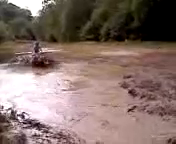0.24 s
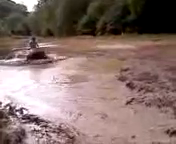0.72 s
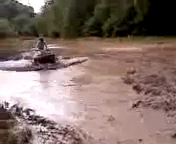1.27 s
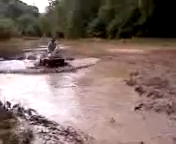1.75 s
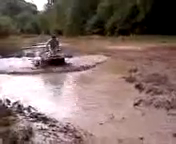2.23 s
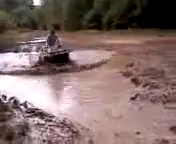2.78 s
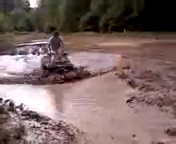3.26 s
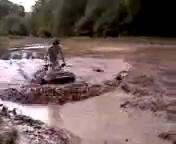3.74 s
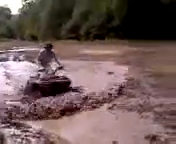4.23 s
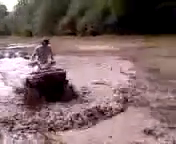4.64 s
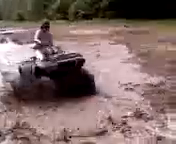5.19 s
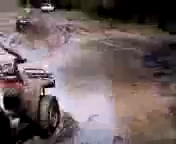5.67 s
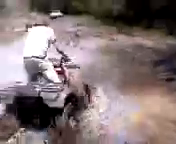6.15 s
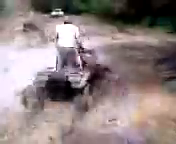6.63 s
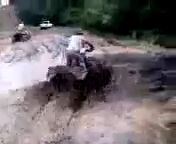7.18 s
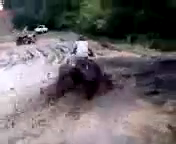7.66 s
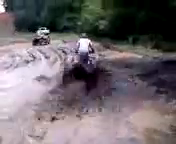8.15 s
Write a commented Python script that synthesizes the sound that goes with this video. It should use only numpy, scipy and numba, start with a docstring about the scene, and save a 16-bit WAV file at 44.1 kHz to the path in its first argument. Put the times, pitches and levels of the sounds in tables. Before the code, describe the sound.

A single-cylinder quad bike mutters at a distance on a muddy pond, then revs and wades closer, its wheels pushing a gurgling bow wave under hissing spray. Abruptly it is right beside the microphone, rasping and blaring amid mud slaps, short squeals and overload ticks, then churns away with a few sharp exhaust barks. Narrow, slightly distorted small-microphone sound, outdoors.

```python
"""A single-cylinder quad bike mutters across a muddy pond, then pulls away and wades toward the listener.
Its firings ring the silencer, the wheels push a gurgling bow wave and drops patter over hissing spray.
The viewpoint jumps beside the bike: the note is muddier, gas rasps and bodywork colours the hiss, amid
mud slaps, short squeal-like rings near 2.1 kHz and brief overload ticks.
The bike then turns its tail, so gas takes over the hiss, and a few barks crack out as it churns away."""
import sys
import numpy as np
from scipy import signal
from scipy.fft import rfft, irfft, next_fast_len
from scipy.io import wavfile
from scipy.ndimage import uniform_filter1d
from numba import njit

SR = 44100
rng = np.random.default_rng(int(sys.argv[2]) if len(sys.argv) > 2 else 0)


def to_wav(s):
    """Save 16-bit WAV."""
    ch = np.atleast_2d(s).T  # columns
    pcm = np.round(np.clip(ch, -1, 1) * 32767)  # PCM
    wavfile.write(sys.argv[1], SR, pcm.astype(np.int16))


N = 370881
TIME = np.arange(N) / SR


def undb(db):
    """Decibels to gain."""
    return 10 ** (np.asarray(db) / 20)


def unit(x):
    """Scale to rms 1."""
    return x / np.sqrt(np.mean(x ** 2))


def curves(table):
    """Each column of a table, after its time column, as a value per sample."""
    time_s, *columns = np.transpose(table)
    return [np.interp(TIME, time_s, column) for column in columns]


def noise():
    """White noise."""
    return rng.standard_normal(N)


def walk(rate_hz):
    """Slow random drift at rms 1: random steps at this rate, smoothed twice."""
    step = int(SR / rate_hz)
    held = np.repeat(noise()[:N // step + 1], step)
    smooth = uniform_filter1d(uniform_filter1d(held, step), step)
    return unit(smooth[:N])


def colour(x, points):
    """Shape a sound with a (freq_hz, level_db) curve, straight in log frequency, then set rms 1."""
    size = next_fast_len(N + 4096)
    freq_hz, level_db = np.transpose(sorted(points))
    bins_hz = np.maximum(np.arange(size // 2 + 1) * SR / size, 1)
    gain = undb(np.interp(np.log(bins_hz), np.log(freq_hz), level_db))
    return unit(irfft(rfft(x, size) * gain, size)[:N])


def blend(a, b, share):
    """Mix two unrelated sounds at constant power; share is that of b."""
    share = np.clip(share, 0, 1)
    return np.sqrt(1 - share) * a + np.sqrt(share) * b


@njit
def svf(x, hz, width_hz):
    """State-variable band-pass with a moving centre."""
    out, band, low = np.empty(len(x)), 0., 0.
    for i in range(len(x)):
        g, damping = np.tan(np.pi * hz[i] / SR), width_hz / hz[i]
        v = (band + g * (x[i] - low)) / (1 + g * (g + damping))
        band, low, out[i] = 2 * v - band, low + 2 * g * v, damping * v
    return out


def resonate(x, hz, width_hz):
    """One resonance, fixed or moving, gain 1 at its centre."""
    return svf(x + 1e-18, hz * np.ones(N), float(width_hz))


def low_pass(x, hz):
    """A steep low-pass."""
    return signal.sosfilt(signal.ellip(10, .2, 80, hz, fs=SR, output="sos"), x)


def bubbles(low_hz, high_hz, cycles, glide, spread_db, count):
    """Many short rings that rise in pitch as they die; a few are much louder than the rest."""
    out = np.zeros(N + SR)
    for when, pitch, size, life in rng.random((count, 4)):
        hz = low_hz * (high_hz / low_hz) ** pitch
        length = min(int(cycles * (.5 + life) * SR / hz), SR)
        age, start = np.arange(length) / length, int(when * N)  # age runs 0-1
        tone = np.sin(2 * np.pi * hz * length / SR * age * (1 + glide * age / 2))
        level_db = -spread_db * np.log(max(size, np.exp(-5)))
        out[start:start + length] += undb(level_db) * np.sqrt(hz) * tone * np.exp(-np.log(100) * age)
    return unit(out[:N])


def ring(start_s, hz, decay_s):
    """A quickly swelling, dying oscillation, at peak 1."""
    out, start = np.zeros(N + SR), int(start_s * SR)
    age_s = np.arange(SR // 10) / SR
    swell = 1 - np.exp(-age_s / 0.00023)
    out[start:start + len(age_s)] = np.sin(2 * np.pi * hz * age_s) * np.exp(-age_s / decay_s) * swell
    return out[:N] / np.abs(out).max()


def swells(rows, attack_s, release_s):
    """Gain in dB over time: each (start_s, length_s, gain_db) row rises, holds and falls back."""
    total_db = np.zeros(N)
    for start_s, length_s, gain_db in rows:
        rise = (TIME - start_s) / attack_s
        fall = 1 - (TIME - start_s - length_s) / release_s
        total_db += gain_db * np.clip(np.minimum(rise, fall), 0, 1)
    return total_db


def close_up():
    """0 while the bike is heard across the pond, 1 once the viewpoint has jumped beside it."""
    view_change_s, fade_s = 5.46, 0.0085
    return np.clip(.5 + (TIME - view_change_s) / fade_s, 0, 1)


def by_view(far, near):
    """Pass from the distant to the close sound when the viewpoint changes."""
    return blend(far, near, close_up())


def astern(front, rear):
    """A value that slides from its front to its rear setting as the tail swings toward the listener."""
    turn_middle_s, turn_length_s = 6.52, 1.3
    return front + (rear - front) * np.clip(.5 + (TIME - turn_middle_s) / turn_length_s, 0, 1)


# how deep the exhaust outlet sits in the water: time_s, depth (0-1)
OUTLET_DEPTH = [(0, .3), (.85, 0), (1.45, .65), (1.75, .45), (2.35, .8), (3.1, 0), (3.4, 1), (4.6, .9),
                (6.05, .5), (6.8, 0), (7.7, 0.5), (8.15, .05), (8.41, 0)]


def outlet_depth():
    """Depth of the exhaust outlet, 0 in air to 1 at its deepest."""
    return curves(OUTLET_DEPTH)[0]


# engine speed: time_s, firing_rate_hz
ENGINE_SPEED = [(0, 35.3), (.5, 29.7), (.95, 40), (1.12, 38.6), (1.38, 47), (1.6, 34.8), (1.92, 42.6),
                (2.08, 41), (2.26, 49.6), (2.48, 45.4), (2.6, 38.3), (2.88, 34.7), (3.44, 44), (3.61, 41.8),
                (3.82, 45.8), (4.03, 43), (4.26, 44.4), (4.38, 48.8), (4.78, 43), (5.08, 33), (5.38, 30.5),
                (5.65, 49), (5.88, 53.6), (6.18, 51), (6.65, 41.8), (7, 52.5), (7.17, 49.3), (7.62, 49.7),
                (7.94, 45.4), (8.15, 49.8), (8.41, 51.8)]


def firing_rate():
    """Firings per second."""
    return curves(ENGINE_SPEED)[0]


def revs():
    """Engine speed in octaves above a 45 Hz cruise."""
    return np.log2(firing_rate() / 45)


# how far away the bike is: time_s, distance_m
BIKE_DISTANCE = [(0, 41), (.75, 29.6), (1.3, 23.4), (2.1, 19.5), (2.9, 14), (3.6, 12), (4.5, 8.46),
                 (5.45, 6.34), (5.47, 3.5), (6, 2.35), (6.6, 3.75), (7.4, 3.65), (8.41, 5.55)]


def distance():
    """Metres from the listener to the bike."""
    return curves(BIKE_DISTANCE)[0]


def loudness(at_1m_db, per_doubling_db, per_octave_db, rear_db):
    """Level in dB: cruising at 1 m, lost per doubling of distance, gained per octave of revs and from behind."""
    return at_1m_db - per_doubling_db * np.log2(distance()) + per_octave_db * revs() + astern(0, rear_db)


# the exhaust blows clear of water and mud and blares: start_s, length_s, gain_db
EXHAUST_BLARES = [(1.6, .45, 3), (2.22, 0.26, 5), (3.72, 0.25, 3), (4.24, 0.48, 3.5), (5.2, 0.25, 3.5),
                  (5.39, 0.12, 11), (5.83, 0.22, 5.5), (6.04, 0.11, 11.5), (6.27, 0.25, 13.5),
                  (6.54, 0.16, 6.5), (6.68, 0.069, 7.5), (6.81, .16, 9), (7.18, .22, 6), (7.59, 0.15, 10),
                  (7.82, .15, 9.5), (7.97, .14, 13), (8.11, .35, 10)]


def blare_db():
    """Extra level of the exhaust while it blows clear."""
    return swells(EXHAUST_BLARES, attack_s=0.025, release_s=0.015)


# low rumble of the moving machine and air: freq_hz, level_db
RUMBLE_SPECTRUM = [(15, -5), (30, 0.5), (60, -1), (110, 1.5), (170, 0.5), (300, -2.5), (700, -46)]


def rumble():
    """The machine shakes air and water as low noise, strongest when it wades deep or blares."""
    level_db = loudness(at_1m_db=-44, per_doubling_db=2.5, per_octave_db=5, rear_db=4)
    effort_db = 5 * outlet_depth() + 0.55 * blare_db()
    return undb(level_db + effort_db + 1.1 * walk(9.7)) * colour(noise(), RUMBLE_SPECTRUM)


# the wheels plunge and throw up water: start_s, length_s, spray_gain_db, wave_gain_db
WHEEL_SPLASHES = [(-.02, 0.08, 9, 5.5), (0.091, 0.45, 5.5, 0), (0.519, 0.036, -0.5, 7.5),
                  (1.08, 0.26, 0, 5.5), (1.342, .04, 1, 6.5), (2.252, 0.039, 0.5, 6.5),
                  (3.308, 0.058, 3, 2), (3.4, 0.069, 0, 2.5), (4.373, 0.073, 1.5, 3.5),
                  (4.61, 0.14, 1, 2.5), (5.02, 0.07, 0, 4), (5.27, .18, -2, 5), (5.466, 0.072, 3, 3.5),
                  (5.824, .3, 0, 0), (6.15, 0.13, -2, 4.5), (6.32, .17, 2, 2.5), (6.677, 0.069, 3.5, 3),
                  (6.87, 0.04, 0.5, 8), (6.98, .05, 2, -2.5), (7.257, .08, 2, -1.5),
                  (7.405, 0.022, 0.5, 9.5), (8.067, 0.17, 1.5, -1.5), (8.335, 0.071, -1, 7)]


def splash_spray_db():
    """Extra spray level as the wheels plunge."""
    rows = [(start_s, length_s, spray_db) for start_s, length_s, spray_db, _ in WHEEL_SPLASHES]
    return swells(rows, attack_s=0.0083, release_s=.05)


def splash_wave_db():
    """Extra bow wave level as the wheels plunge, slower to rise and quicker to fall than the spray."""
    rows = [(start_s, length_s, wave_db) for start_s, length_s, _, wave_db in WHEEL_SPLASHES]
    return swells(rows, attack_s=0.018, release_s=0.026)


# churned muddy water: freq_hz, level_db
SLOSH_SPECTRUM = [(120, -9.5), (250, -0.5), (400, -2.5), (560, 0.6), (800, 2.5), (1000, -8), (1350, -3.5),
                  (1700, -15), (2600, -40.5)]
# froth on the breaking wave: freq_hz, level_db
FROTH_SPECTRUM = [(400, -16), (780, -6), (900, 2), (1080, -0.5), (1400, 1), (1700, -6), (2600, -21.5)]


def bow_wave():
    """Large gurgling bubbles over a surging wash, with froth where the wave breaks."""
    gurgle = bubbles(288, 1600, cycles=5.6, glide=0.085, spread_db=3.5, count=5000)
    wash = noise() * undb(2 * walk(25))
    slosh = blend(colour(gurgle, SLOSH_SPECTRUM), colour(wash, SLOSH_SPECTRUM), 0.44)
    small_bubbles = bubbles(700, 1900, cycles=9.7, glide=0.059, spread_db=3.0, count=5000)
    # froth loses 1 dB every 2 m, and 9 dB from behind
    froth_db = 0.5 - distance() / 2.0 + astern(0, -9)
    wave = slosh + undb(froth_db) * colour(small_bubbles, FROTH_SPECTRUM)
    level_db = loudness(at_1m_db=-24.5, per_doubling_db=3.5, per_octave_db=3, rear_db=1.5)
    return undb(level_db + splash_wave_db() + 1.1 * walk(14)) * wave


def hollows(x):
    """Close sounds take on the ring of the tailpipe and two drifting resonances, wheel arch and frame."""
    drift = 0.051  # share of pitch
    arch_hz = astern(2330, 2120) * (1 + drift * walk(11))
    frame_hz = 3100 * (1 + drift * walk(11))
    # the arch is hidden from behind; the other openings face the rear
    arch = undb(astern(0, -1.5)) * resonate(x, arch_hz, width_hz=440)
    frame = undb(astern(-1.5, 5.5)) * resonate(x, frame_hz, width_hz=180)
    tailpipe = undb(astern(-17, -2.5)) * resonate(x, hz=1760, width_hz=180)
    return unit(x + arch + frame + tailpipe)


# spray and gas heard from across the pond: freq_hz, level_db
FAR_SPECTRUM = [(650, -48), (1100, -12), (1390, -7.5), (1700, -8), (1960, 2), (2200, -3.5), (2460, 3),
                (2870, -4.5), (3190, 2), (3480, -5.5), (4380, -35.5), (5690, -62.5), (9640, -120)]
# spray beside the wheels: freq_hz, level_db
NEAR_SPECTRUM = [(650, -28.5), (1100, -12.5), (1320, -34), (1640, -16.5), (1770, -4), (2230, -0.5),
                 (2390, 1), (2730, -5), (3240, -2), (3380, 0), (3620, -7), (4380, -35), (5690, -74.5),
                 (9640, -120)]


def spray():
    """Drops patter on the pond over the hiss of torn water, in uneven sheets."""
    drops = bubbles(1400, 4148, cycles=33, glide=0.013, spread_db=2.5, count=10000)
    torn_water = noise()
    far = blend(colour(drops, FAR_SPECTRUM), colour(torn_water, FAR_SPECTRUM), 0.83)
    near = blend(colour(drops, NEAR_SPECTRUM), colour(torn_water, NEAR_SPECTRUM), 0.63)
    return by_view(far, hollows(near)) * undb(0.91 * walk(35))


def puff(age_s, rise_s, decay_s, rest):
    """Turbulent gas that bursts out after each firing and dies down to a steady flow."""
    burst = (1 - np.exp(-age_s / rise_s)) * np.exp(-age_s / decay_s)
    return unit(noise() * (rest + burst))


# gas leaving the outlet, heard close up: freq_hz, level_db
GAS_SPECTRUM = [(590, -46.5), (1000, -10), (1240, -15), (1400, -3), (1610, 1.5), (1910, -11.5), (2000, -3),
                (2130, 2.5), (2270, -0.5), (2660, -7), (2880, 3.5), (3080, -4), (3590, -5.5), (4090, -16),
                (4380, -33.5), (5690, -57), (9640, -120)]


def gas(age_s, strength):
    """Each firing spits a rasping burst of gas, as strong as the firing itself."""
    bursts = strength * puff(age_s, rise_s=.003, decay_s=.0058, rest=.17)
    return by_view(colour(bursts, FAR_SPECTRUM), hollows(colour(bursts, GAS_SPECTRUM)))


def ripples(x, lag_s, sway, rate_hz, gain):
    """An echo off the heaving water; its changing delay slides the bright bands about."""
    lag = lag_s * SR * (1 + sway * walk(rate_hz))
    samples = np.arange(N)
    return unit(x + gain * np.interp(samples - lag, samples, x))


def hiss(age_s, strength):
    """Spray and exhaust gas share the treble, with more gas from behind, and waver off the choppy surface."""
    sizzle = blend(spray(), gas(age_s, strength), astern(0.092, 0.65))
    wavering = ripples(sizzle, lag_s=.0019, sway=.16, rate_hz=14, gain=.38)
    level_db = loudness(at_1m_db=-8.5, per_doubling_db=5.5, per_octave_db=.5, rear_db=-.5)
    return undb(level_db + splash_spray_db()) * wavering


# mud slaps, short squeal-like rings near 2.1 kHz (5.511-5.546 s) and brief overload ticks
# (5.91-6.08 s, 6.965-6.983 s): start_s, ring_peak_db, pitch_hz, decay_s, thud_db (relative to the ring)
SHORT_HITS = [(4.171, -17, 2400, .002, -8), (5.436, -11, 1090, .0019, -10), (5.511, -6, 2144, .0056, -29),
              (5.528, -6, 2054, .0064, -23), (5.546, -11, 2320, .007, -35.5),
              (5.855, -10, 2630, 0.0051, -11), (5.91, -4, 2840, 0.0014, -12.5),
              (5.928, 1, 2670, 0.00078, -15), (6.08, -3.5, 2340, .002, -15),
              (6.965, -3.1, 2080, .0015, -11), (6.983, -2, 3000, .0015, -16), (7.021, -9, 2280, .0034, -16)]


def short_hits():
    """Slaps, squeal-like rings and ticks: each a short dying ring with a dull low thud beneath it."""
    out = np.zeros(N)
    for start_s, ring_db, pitch_hz, decay_s, thud_db in SHORT_HITS:
        bright = ring(start_s, pitch_hz, decay_s)
        thud = undb(thud_db) * ring(start_s, hz=310, decay_s=0.0086)
        out += undb(ring_db) * (bright + thud)
    return out


# sharp exhaust barks as the throttle eases: start_s, peak_db, pitch_hz
EXHAUST_BARKS = [(7.854, -13.5, 1570), (7.896, -9.5, 2225), (7.918, -15, 2200), (7.941, -17, 1610)]


def barks():
    """Single hard firings crack out of the tailpipe."""
    return sum(undb(peak_db) * ring(start_s, pitch_hz, decay_s=0.0052)
               for start_s, peak_db, pitch_hz in EXHAUST_BARKS)


def firings(rate_hz, jitter_s, scatter_db):
    """One uneven pulse per engine cycle; also the time since it and its strength."""
    starts = np.flatnonzero(np.diff(np.floor(np.cumsum(rate_hz) / SR), prepend=-1))
    late, strong = rng.standard_normal((len(starts), 2)).T
    starts = np.sort(np.clip(starts + (jitter_s * SR * late).astype(int), 0, N - 1))
    pulses, strength = np.zeros(N), undb(scatter_db * strong)
    pulses[starts] = strength
    last = np.maximum(np.searchsorted(starts, np.arange(N), side="right") - 1, 0)
    return pulses, np.abs(TIME - TIME[starts[last]]), strength[last]


# higher modes of the exhaust: pitch_hz, width_hz, level_db
HIGHER_MODES = [(357, 140, -12.5), (660, 89, -5.5), (770, 110, -29)]


def silencer(x, width_hz, boom_db):
    """A steep main resonance that sinks as the outlet dips, a low boom and weaker pipe modes."""
    pipe_hz = 326.8 - 74 * outlet_depth()
    main = resonate(resonate(x, pipe_hz, width_hz), pipe_hz, 6.1 * width_hz)
    boom = undb(boom_db) * resonate(resonate(x, 191, 38), 191, 38)
    out = main + boom
    for mode_hz, mode_width_hz, level_db in HIGHER_MODES:
        mode = resonate(resonate(x, mode_hz, mode_width_hz), mode_hz, 3 * mode_width_hz)
        out = out + undb(level_db) * mode
    return out


def chambers(x):
    """The silencer's chambers hold each pulse back near their own pitch, so the beats run together."""
    for hz, width_hz in [(235, 49), (295, 26), (345, 82)]:
        x = x - 2 * resonate(x, hz, width_hz)  # all-pass: delays without changing the level
    return x


# what the small outlet radiates: freq_hz, level_db
OUTLET_SPECTRUM = [(60, -13), (135, -11.5), (165, 1.5), (350, 2), (490, -7.5), (620, 0), (900, -11)]


def exhaust(pulses, age_s, gargle, boom_db):
    """Firings ring the silencer; water at the outlet turns a share of the clean beats into a gargle."""
    clean = unit(silencer(pulses, width_hz=70, boom_db=boom_db))
    bubbling_gas = puff(age_s, rise_s=.001, decay_s=.016, rest=.11)
    wet = unit(silencer(bubbling_gas, width_hz=120, boom_db=boom_db))
    return colour(chambers(blend(clean, wet, gargle)), OUTLET_SPECTRUM)


def engine(pulses, age_s):
    """The note grows louder and cleaner with revs, is muffled by water and mud, and blares when it blows clear."""
    depth = outlet_depth()
    # revs and blares blow the gargle away, mud adds to it
    gargle = .21 - .7 * revs() + .3 * close_up() - .018 * blare_db()
    boom_db = -8.5 + 1 * depth + 10 * revs() - 11.5 * close_up()
    # the exhaust only mutters until the bike pulls away at 0.6 s
    idle_db = -4.5 * np.clip((0.6 - TIME) / .04, 0, 1)
    # close up, the outlet is half choked with mud
    muffle_db = -3 * depth - 10 * close_up()
    level_db = loudness(at_1m_db=-22, per_doubling_db=3.5, per_octave_db=9.5, rear_db=3)
    note = exhaust(pulses, age_s, gargle, boom_db)
    return undb(level_db + idle_db + muffle_db + blare_db()) * note


def scene():
    """Rumble, water, short hits and engine, sharing one run of firings and one path of the bike."""
    pulses, age_s, strength = firings(firing_rate(), jitter_s=.0001, scatter_db=1.2)
    background = rumble() + bow_wave() + hiss(age_s, strength)
    foreground = short_hits() + barks() + engine(pulses, age_s)
    return (background + foreground)[None]


def record(dry):
    """A small pickup rounds the peaks, keeps a narrow band, and clips what still exceeds full scale."""
    band_hz, full_scale, top_hz = 4520, .7, 16000
    narrow = low_pass(np.tanh(dry), band_hz)
    return low_pass(np.clip(narrow, -full_scale, full_scale), top_hz)


dry = scene()
out = record(dry)
to_wav(out)
```